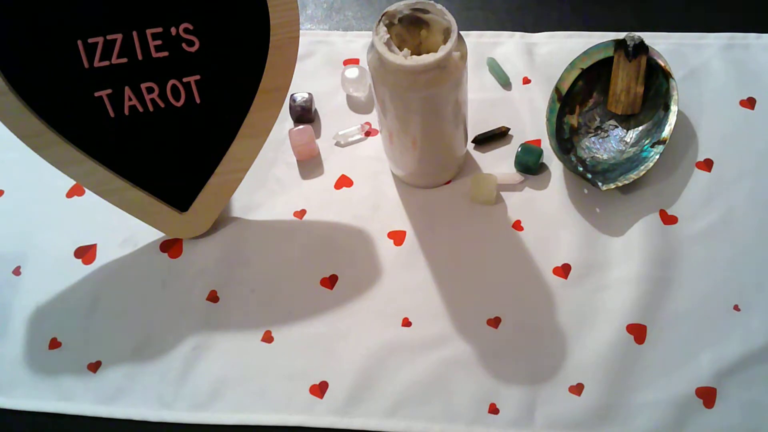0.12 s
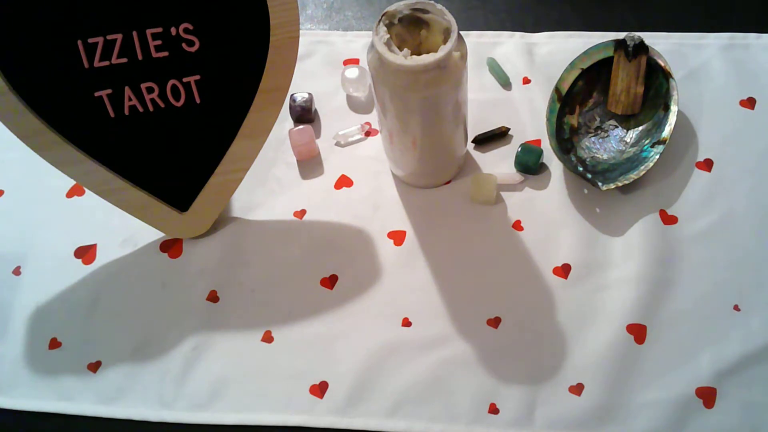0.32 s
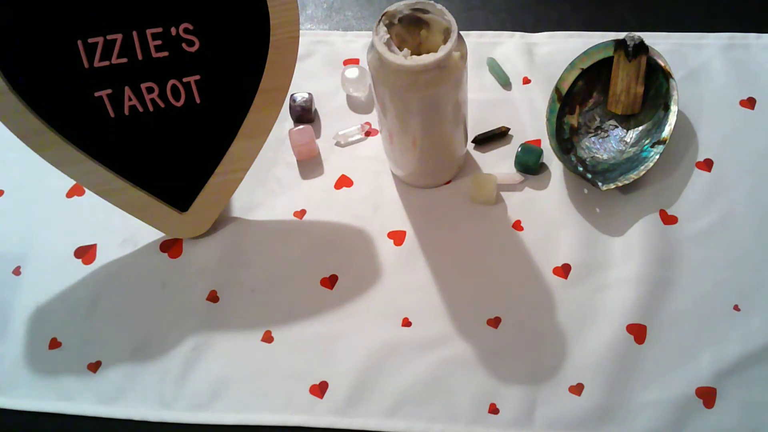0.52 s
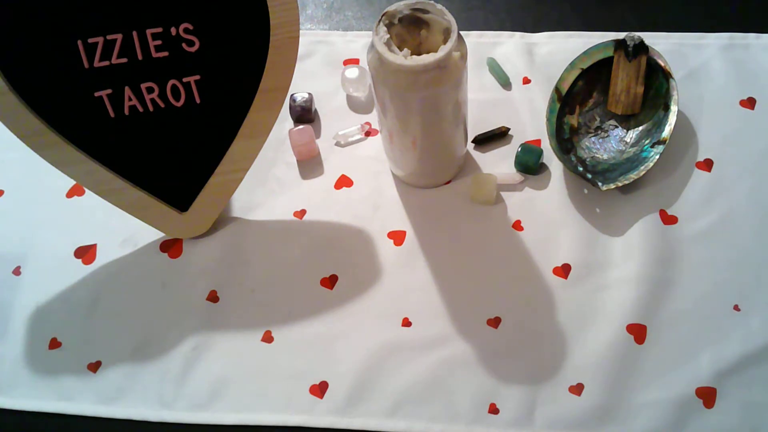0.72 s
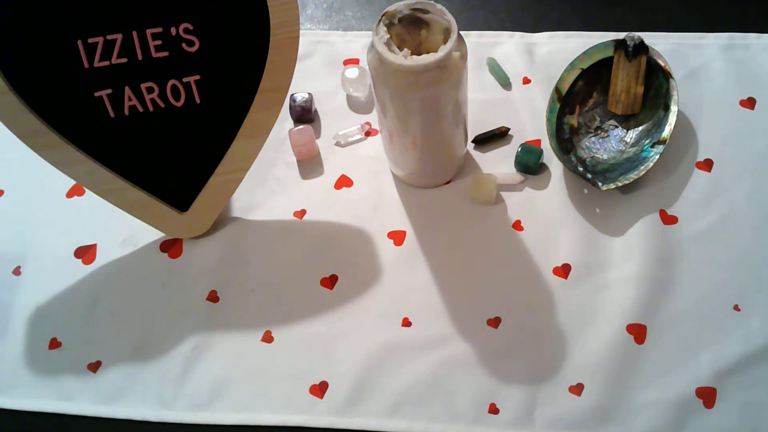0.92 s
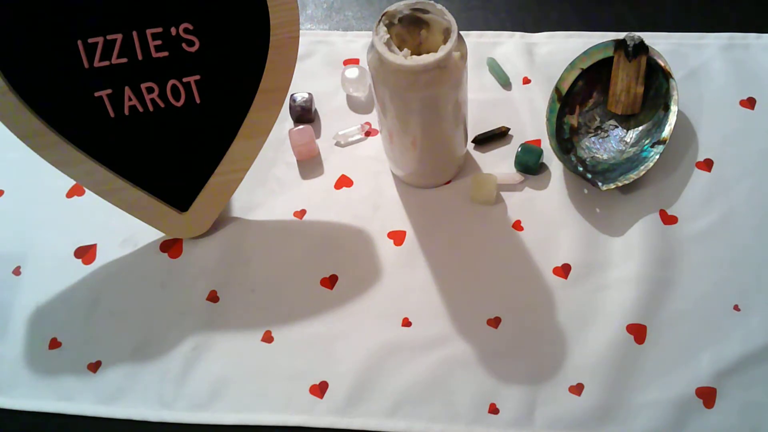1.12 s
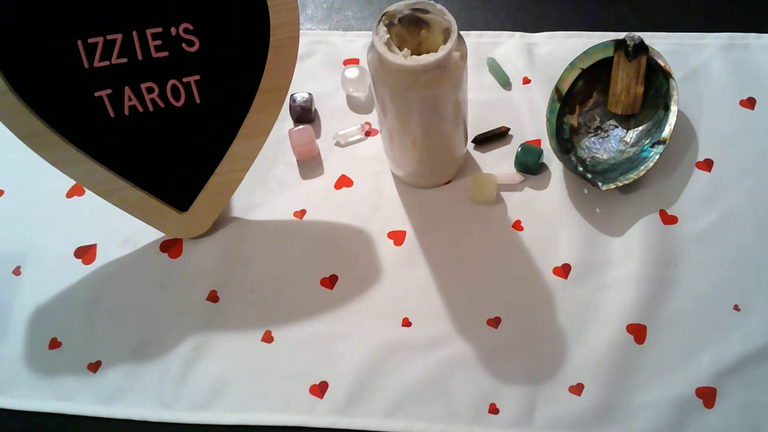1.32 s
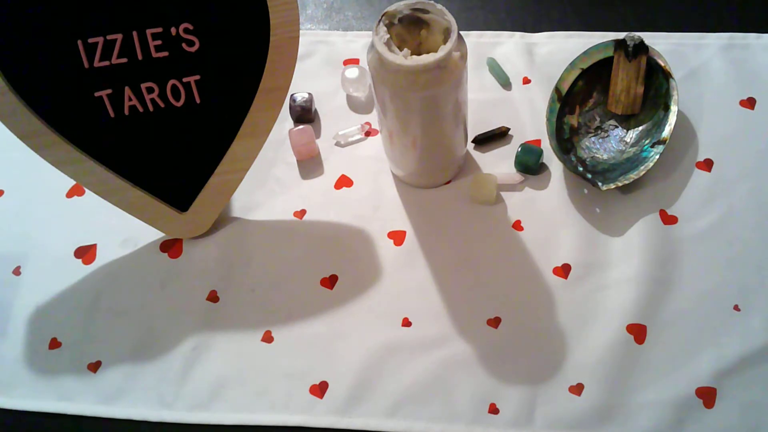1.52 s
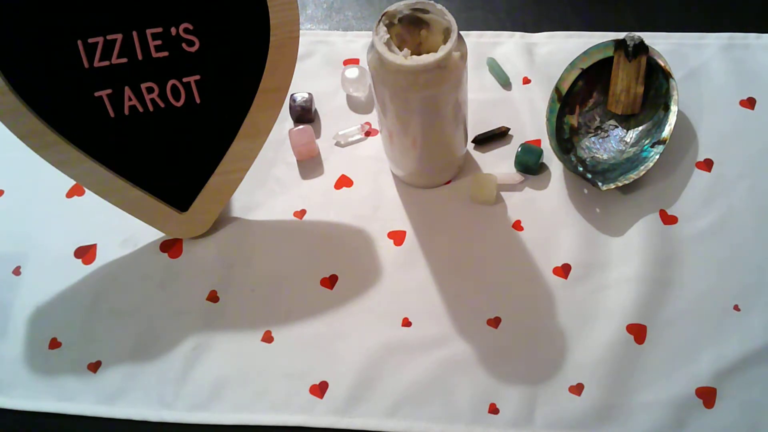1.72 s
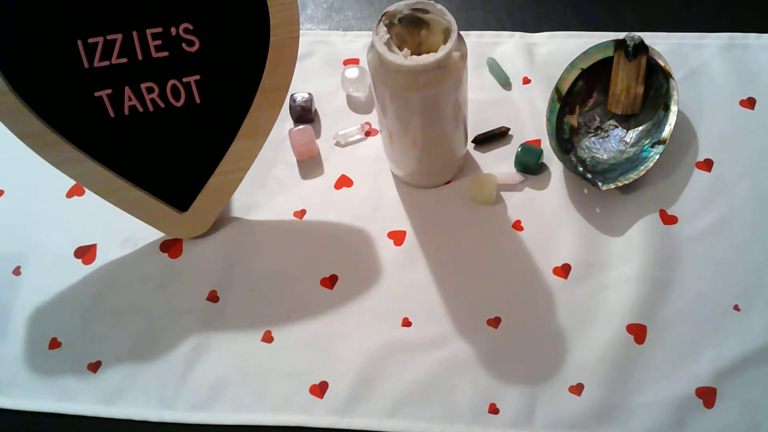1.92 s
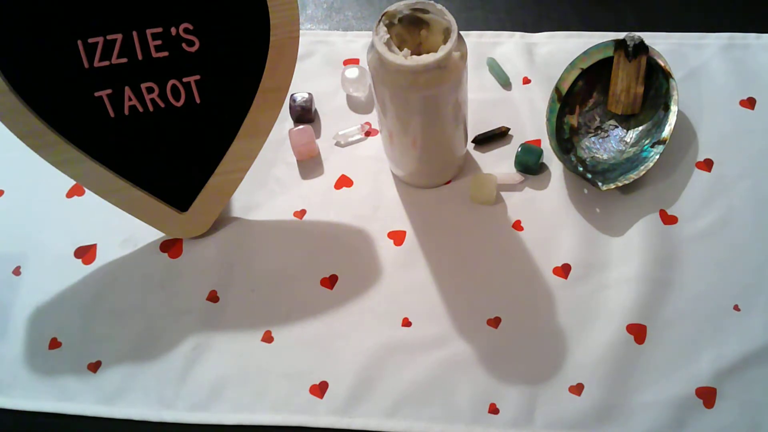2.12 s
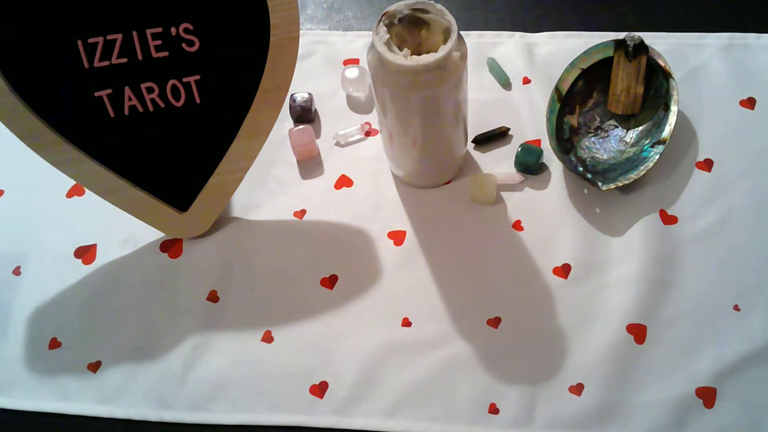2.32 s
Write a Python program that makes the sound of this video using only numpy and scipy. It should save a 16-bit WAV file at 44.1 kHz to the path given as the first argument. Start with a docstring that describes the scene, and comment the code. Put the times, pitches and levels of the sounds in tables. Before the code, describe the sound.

A playing card snaps sharply against the deck, then faint finger rustles and one soft tap.

```python
"""Tarot cards handled over a cloth-covered table in a small, quiet room.
A card edge snaps against the deck: short cracks and rattles, and the deck rings as a set of dying tones.
Fingers brush the cards, and cards slide: tiny random clicks, coloured and swelled into strokes.
A card is tapped home with dull knocks, and another slips after it; dragged edges sing through a resonance.
The room adds a short tail of dying noise, over a low, steady background of coloured noise."""
import sys
import numpy as np
from scipy import signal
from scipy.fft import rfft, irfft
from scipy.io import wavfile
from scipy.ndimage import uniform_filter1d

SR = 44100
rng = np.random.default_rng(int(sys.argv[2]) if len(sys.argv) > 2 else 0)


def transcribe(u):
    """Save the signal u as a 16-bit wav file named by the first command-line argument.

    u: samples, shape (n,) or (channels, n), limited to [-1, 1]; the rate is SR.
    q: integer samples, one column per channel.
    """
    v = np.clip(np.atleast_2d(u).T, -1, 1)
    q = np.round(v * 32767).astype(np.int16)
    wavfile.write(sys.argv[1], SR, q)


N = 108045  # length in samples
T = np.arange(N) / SR  # time in s
HZ = np.maximum(np.arange(N + 1) * SR / (2 * N), 1)  # frequencies of a spectrum of 2 N samples


def undb(db):
    """Turn decibels into a gain."""
    return 10 ** (np.asarray(db) / 20)


def unit(x):
    """Scale a response to energy 1."""
    return x / np.sqrt(np.sum(x ** 2))


def through(x, response):
    """Pass a sound through a response, as if each sample set that response off."""
    return signal.fftconvolve(x, response)[:N]


def colour(points, tilt_db=0):
    """Make a response of energy 1 with this spectrum, tilted about 1 kHz in dB per octave."""
    hz, db = np.array(points, float).T
    octaves = np.log2(np.maximum(HZ, 200) / 1000)  # the tilt goes no further below 200 Hz
    db = np.interp(np.log(HZ), np.log(hz), db) + tilt_db * octaves
    # Folding the cepstrum (spectrum of the log spectrum) makes the response start at once
    cepstrum = irfft(np.log(undb(db)))
    cepstrum[1:N] *= 2
    cepstrum[N + 1:] = 0
    return unit(irfft(np.exp(rfft(cepstrum)))[:N])


def fade(t60):
    """Die away exponentially, by 60 dB in t60 s."""
    return np.exp(-np.log(1000) * T / t60)


def burst(t60):
    """Make dying noise of energy 1, evened out across the spectrum."""
    even_hz = 200  # width over which the power is averaged
    spectrum = rfft(rng.standard_normal(N) * fade(t60), 2 * N)
    power = uniform_filter1d(np.abs(spectrum) ** 2, size=int(even_hz * 2 * N / SR))
    return unit(irfft(spectrum / np.sqrt(power))[:N])


def at(x, start):
    """Delay a sound to its start time in s."""
    return np.concatenate([np.zeros(max(int(start * SR), 0)), x])[:N]


def swell(peak, rise, fall, db):
    """Shape a stroke that grows to its peak and dies away."""
    return undb(db) * np.exp(np.minimum((T - peak) / rise, (peak - T) / fall))


def friction():
    """Paper fibres catch and let go: dense clicks of uneven size and random sign, scaled to rms 1."""
    grains_per_s, spread_db = 4400, 3
    hits = rng.random(N) < grains_per_s / SR
    signs = np.sign(rng.standard_normal(N))
    sizes = undb(spread_db * np.minimum(rng.exponential(size=N), 4))
    clicks = hits * signs * sizes
    return clicks / np.std(clicks)


def air():
    """Steady low room noise with a faint hiss: random noise given a fixed colour."""
    # Background colour: f/Hz, relative level/dB
    air_colour = [(12, -41), (20, -12.5), (147, -3.5), (316, -10.5), (452, -14), (514, -15.5), (681, -18.5),
                  (879, -19), (1080, -22), (1940, -23.5), (2320, -29.5), (2570, -29.5), (3870, -35),
                  (5260, -41), (6790, -32.5), (7340, -33.5), (9000, -61), (11700, -100), (19800, -120)]
    air_db = -58
    noise = rng.standard_normal(N)
    return undb(air_db) * irfft(rfft(noise) * rfft(colour(air_colour)), N)


def slides():
    """Card rubs on card: each slide is a swell of coloured friction clicks."""
    # Slides: peak t/s, rise t/s, fall t/s, level/dB, brightness/(dB per octave)
    strokes = [(.008, 0.025, 0.031, -52, 0.5), (.178, .001, .006, -52.5, 0.5),
               (.198, 0.007, 0.016, -44, -0.5), (.31, 0.022, 0.036, -56, -1.5),
               (.447, .02, 0.022, -55.5, -0.5), (0.744, 0.013, 0.023, -50.5, -2.5),
               (1.403, 0.013, 0.021, -65, -1.5), (2.169, 0.019, 0.011, -47, 1.5),
               (2.342, 0.017, 0.01, -50.5, 0.5)]
    # Sliding colour: f/Hz, relative level/dB
    slide_colour = [(120, -28), (200, 0), (275, -3.5), (554, -1), (1080, -2.5), (1310, -6), (1590, -8),
                    (2080, -4.5), (2290, -8), (3300, -10), (4610, -21), (6870, -3.5), (9000, -30.5),
                    (11700, -70.5), (19800, -120)]
    out = np.zeros(N)
    for peak, rise, fall, db, tilt_db in strokes:
        rubbing = through(friction(), colour(slide_colour, tilt_db))
        out += swell(peak, rise, fall, db) * rubbing
    return out


def deck_ring():
    """The struck deck rings at many pitches at once, each dying at its own rate; energy 1."""
    # Ringing of the deck: f/Hz, relative level/dB, time to fall 60 dB t/s
    modes = [(237, -12, 0.035), (530.5, 2, 0.062), (680, -8.5, .09), (888, -2, .07), (1087, -6, 0.064),
             (1144, 6, 0.071), (1270, -7, .1), (1560, -2, 0.14), (1672, -6, 0.17), (1940, -20, 0.059),
             (2304, -7, 0.091), (2674, -3, 0.043), (6880, -8.5, 0.26), (7470, -7.5, 0.14)]
    ring = np.zeros(N)
    for hz, db, t60 in modes:
        phase = rng.uniform(0, 2 * np.pi)
        ring += undb(db) * np.sin(2 * np.pi * hz * T + phase) * fade(t60)
    return unit(ring)


def snaps():
    """Each contact cracks and rattles the card, the hardest rings the deck; also return the bare blows."""
    # Card edge contacts: start t/s, relative level/dB, brightness/(dB per octave)
    contacts = [(0.1765, -30, 2.5), (0.1901, -15, -0.5), (.1955, -34, -1.5), (.2108, -11.5, -6.5),
                (.2119, 0.5, 0.5), (0.2138, -1, 2.5), (0.2146, -1, -1), (0.2189, -14.5, 0.5),
                (0.2233, -10.5, 1.5), (0.2283, -11.5, 2)]
    # Snap colour: f/Hz, relative level/dB
    snap_colour = [(53, -61), (90, -42), (149, -9.5), (223, -2), (375, -5), (520, 1), (794, -6.5),
                   (1080, -1), (1290, 0.5), (1390, -29), (1590, 1), (1930, -9), (2670, -7), (3060, -17.5),
                   (4330, -14), (4670, -19), (5350, -16.5), (6360, -22), (7140, -3.5), (7570, -12.5),
                   (9000, -36), (11700, -57), (19800, -120)]
    snap_db, ring_db = -4, -6
    rattle_db, rattle_t60_s = -0.5, 0.013  # rattle level is relative to the crack
    ring = deck_ring()
    out, blows = np.zeros(N), np.zeros(N)
    for start, db, tilt_db in contacts:
        crack = colour(snap_colour, tilt_db)
        rattle = unit(through(burst(rattle_t60_s), crack))
        gain = undb(snap_db + db)
        out += gain * at(crack + undb(rattle_db) * rattle, start)
        blows[int(start * SR)] += gain
    hardest = max(contacts, key=lambda row: row[1])
    return out + undb(ring_db) * at(ring, hardest[0]), blows


def brushes():
    """Fingertips make a thin, high hiss on the card faces: friction clicks in swelling strokes."""
    # Finger strokes: peak t/s, rise t/s, fall t/s, level/dB
    strokes = [(.35, .03, 0.034, -63), (.47, .03, 0.056, -66.5), (.55, 0.051, 0.027, -68),
               (0.674, .015, 0.037, -68.5), (0.759, 0.022, 0.071, -67.5), (.88, 0.062, 0.023, -66),
               (.96, 0.018, 0.015, -64), (1.21, 0.11, 0.034, -61), (1.404, 0.019, 0.022, -62.5),
               (1.538, .012, 0.023, -64.5), (1.724, 0.028, 0.058, -69), (1.936, 0.074, 0.011, -68),
               (2.149, 0.017, 0.043, -61.5), (2.29, 0.033, 0.032, -62.5), (2.354, 0.024, 0.06, -63)]
    # Brushing colour: f/Hz, relative level/dB
    brush_colour = [(600, -22.5), (2500, -6.5), (4000, -20.5), (5500, -19.5), (6400, -9.5), (7050, -3),
                    (7700, -14.5), (8800, -33.5)]
    envelope = sum(swell(*row) for row in strokes)
    return envelope * through(friction(), colour(brush_colour))


def taps():
    """A dull knock on the deck, then the cards settle with a dying rattle."""
    # Soft taps: start t/s, relative level/dB, brightness/(dB per octave)
    knocks = [(0.737, -18.5, -2.5), (0.743, -15, -3), (2.166, -17, 5), (2.168, -0.5, -0.5),
              (2.1734, -16, 0.5), (2.1779, -13, -1.5), (2.295, -22, 12)]
    # Tap colour: f/Hz, relative level/dB
    tap_colour = [(60, -25.5), (130, -11), (220, 2.5), (400, 2.5), (700, -12.5), (1000, -24), (1350, -11),
                  (2400, -31.5), (2850, -13), (4200, -21), (4900, -13), (5600, -19.5), (6400, -13),
                  (7050, -4.5), (7800, -22.5), (9000, -40)]
    tap_db = -13
    settle_db, settle_t60_s = -10, 0.055  # settling level is relative to the knock
    out = np.zeros(N)
    for start, db, tilt_db in knocks:
        knock = colour(tap_colour, tilt_db)
        settle = unit(through(burst(settle_t60_s), knock))
        out += undb(tap_db + db) * at(knock + undb(settle_db) * settle, start)
    return out


def scrapes():
    """A dragged card edge sings: friction drives one resonance of the bent card."""
    # Scrapes: peak t/s, rise t/s, fall t/s, level/dB, pitch f/Hz, damping width f/Hz
    strokes = [(2.142, 0.013, 0.0082, -56, 3350, 400), (2.322, 0.0079, 0.0078, -55, 2580, 450),
               (2.34, 0.015, 0.0063, -53.5, 1880, 510)]
    out = np.zeros(N)
    for peak, rise, fall, db, hz, width in strokes:
        # Growing with T before dying gives the resonance a soft start
        resonance = unit(T * np.sin(2 * np.pi * hz * T) * np.exp(-np.pi * width * T))
        out += swell(peak, rise, fall, db) * through(friction(), resonance)
    return out


def room_tail(blows, tap, rub):
    """The room answers with noise that builds up quickly and dies; the snaps' tail has its own colour."""
    # Colour of the snaps' tail: f/Hz, relative level/dB
    tail_colour = [(88, -50.5), (150, -2), (201, -6.5), (308, -10.5), (419, -1.5), (542, -9.5), (701, -6.5),
                   (832, -10.5), (1150, -10), (1520, -6), (1930, -9), (2370, -10), (4610, -23),
                   (6960, -12.5), (9000, -37.5), (11700, -65), (19800, -120)]
    t60_s, build_s = 0.25, 0.0071
    snap_room_db, tap_room_db, rub_room_db = -8.5, -12, -8.5
    room = unit(burst(t60_s) * (1 - np.exp(-(T / build_s) ** 2)))
    snap_room = unit(through(room, colour(tail_colour)))
    snap_tail = undb(snap_room_db) * through(blows, snap_room)
    soft_sounds = undb(tap_room_db) * tap + undb(rub_room_db) * rub
    return snap_tail + through(soft_sounds, room)


def scene():
    """Add all card sounds, their short room tail and the background."""
    snap, blows = snaps()
    tap = taps()
    rub = slides() + scrapes() + brushes()
    return (snap + tap + rub + room_tail(blows, tap, rub) + air())[None]


def record(dry):
    """The recorder cuts the top steeply: a low-pass filter at 8750 Hz."""
    top_hz = 8750
    # 0.2 dB ripple below the cut, 70 dB down above it
    low_pass = signal.ellip(8, .2, 70, top_hz, fs=SR, output="sos")
    return signal.sosfilt(low_pass, dry)


dry = scene()
out = record(dry)
transcribe(out)
```